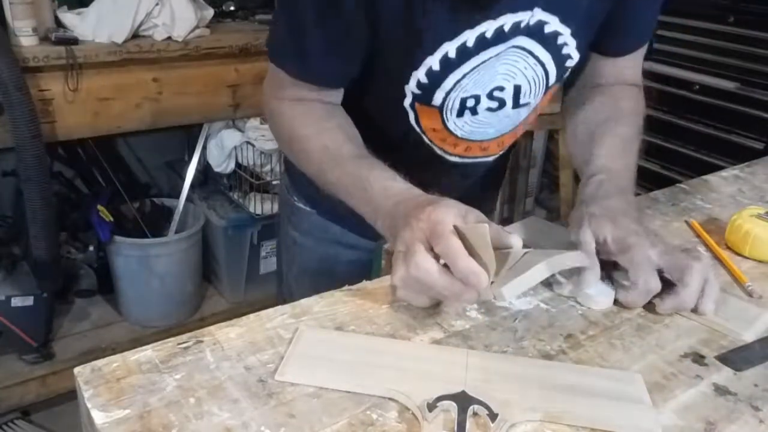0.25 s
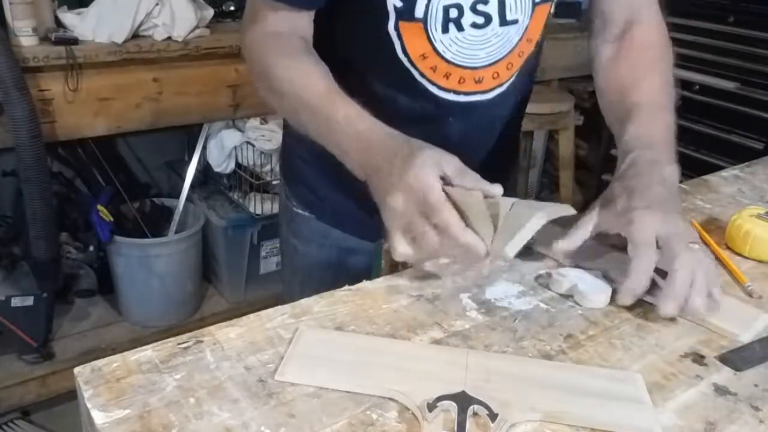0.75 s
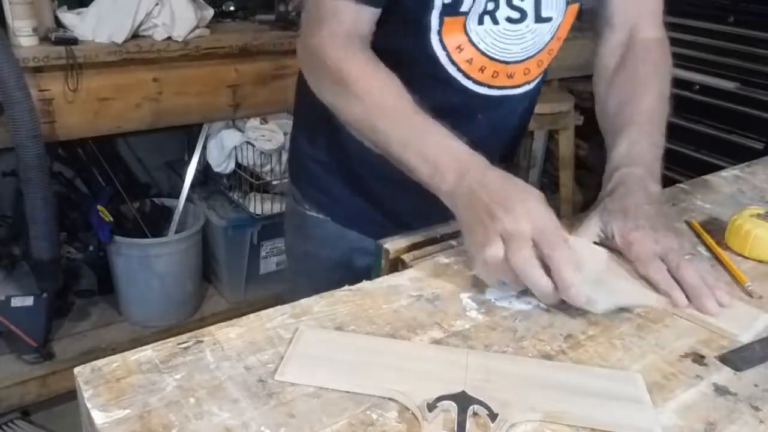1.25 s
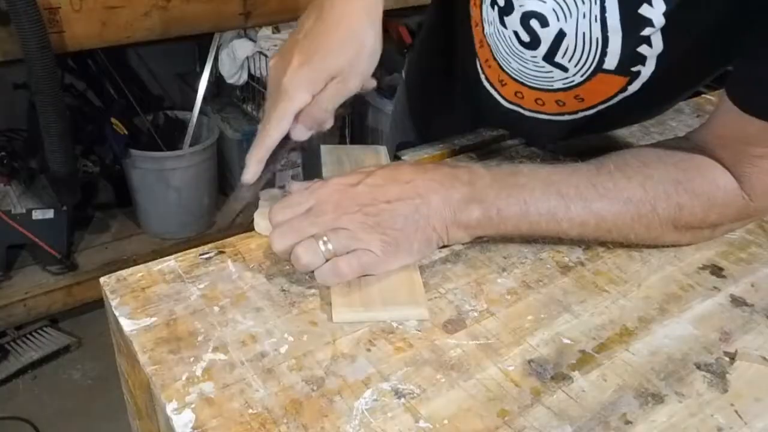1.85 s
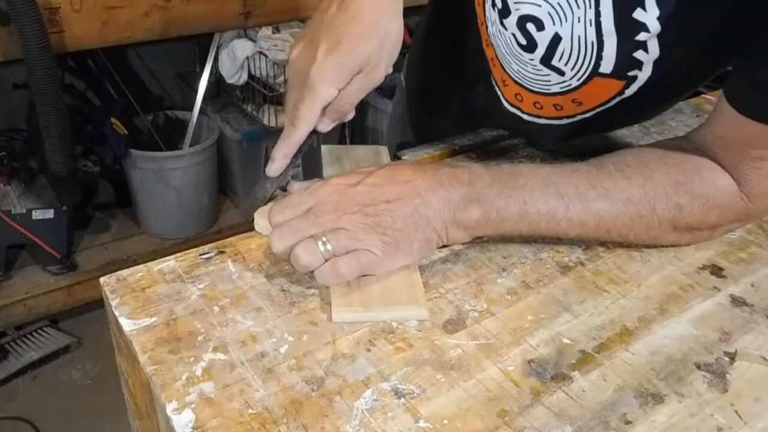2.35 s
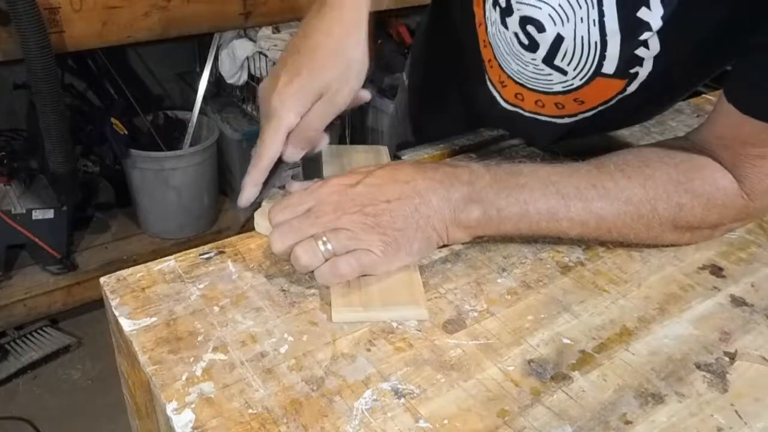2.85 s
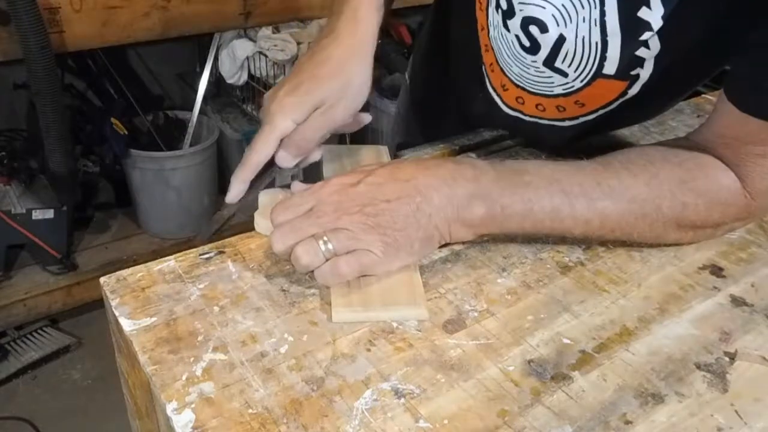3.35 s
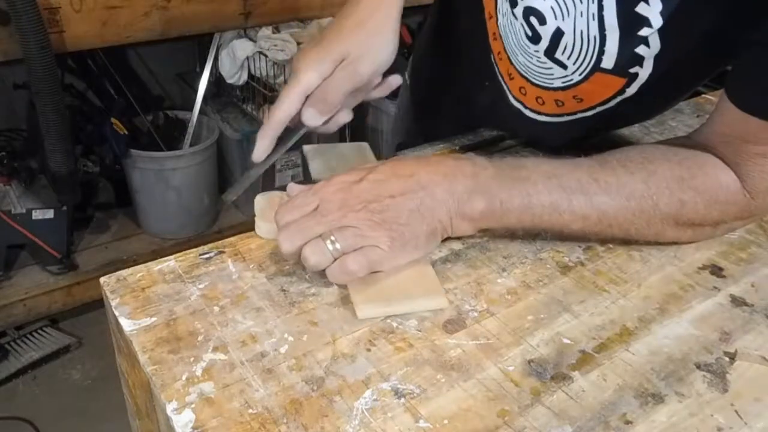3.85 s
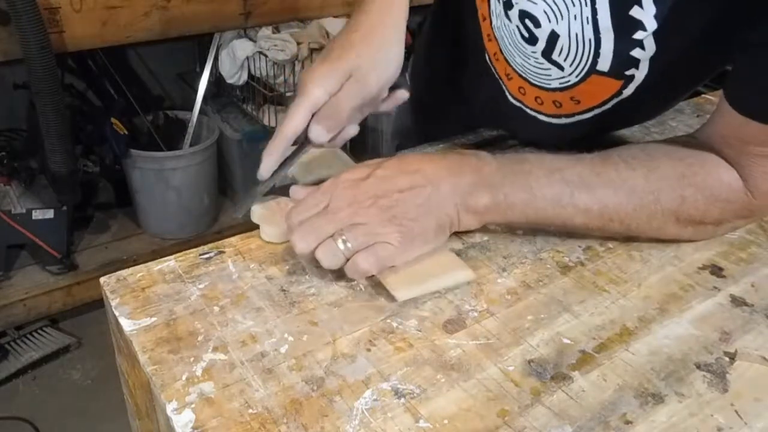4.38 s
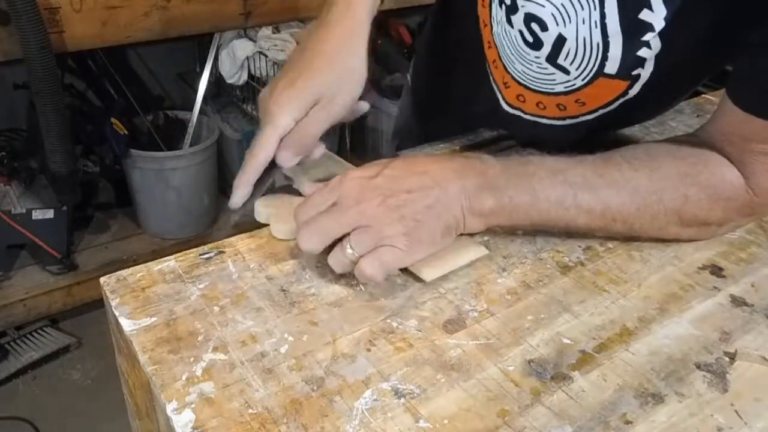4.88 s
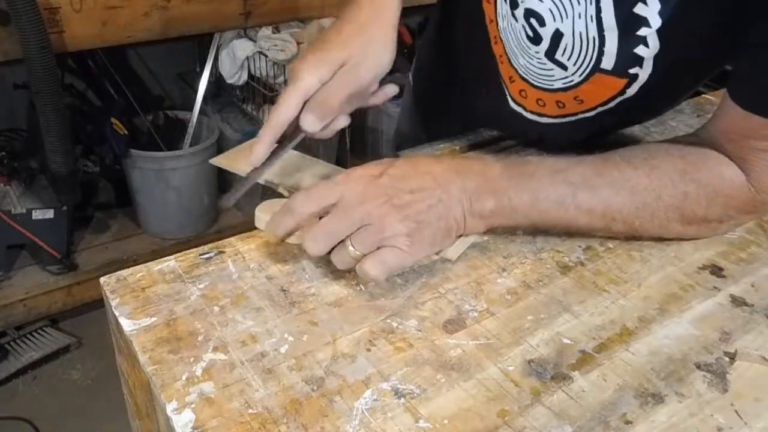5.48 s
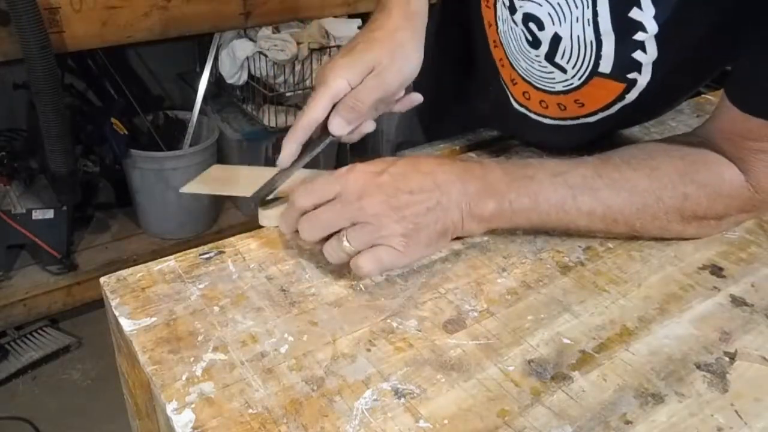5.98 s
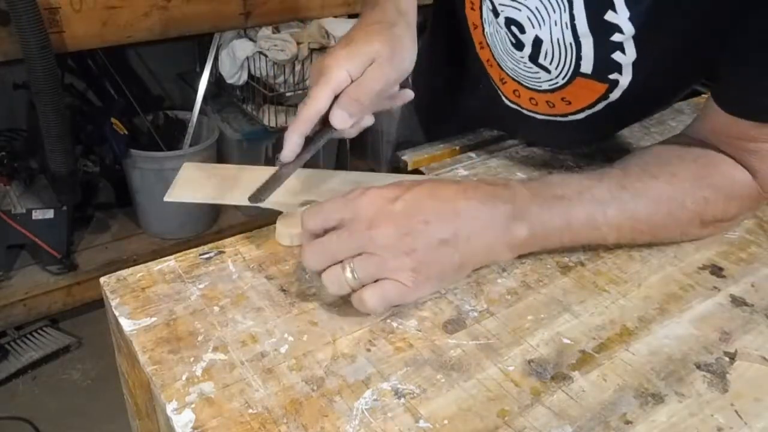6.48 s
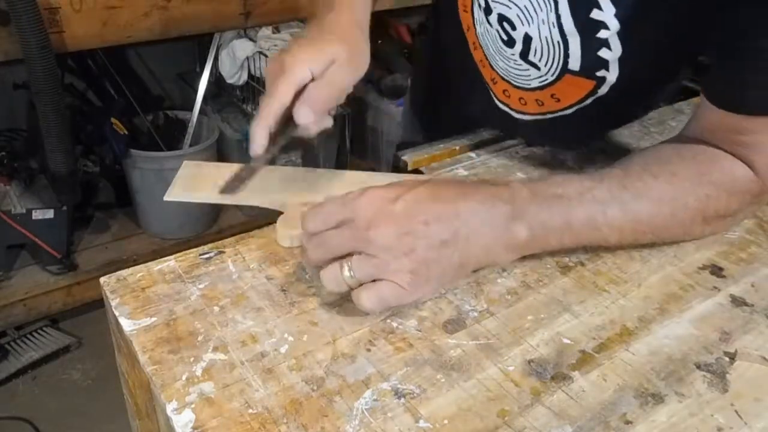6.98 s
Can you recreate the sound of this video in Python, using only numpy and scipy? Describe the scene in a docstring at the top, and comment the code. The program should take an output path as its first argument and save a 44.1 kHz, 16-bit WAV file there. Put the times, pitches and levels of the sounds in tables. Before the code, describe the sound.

Brief dry sanding scuffs, then short woody file strokes with sharp knocks on a hollow-ringing piece, ending with a board sliding over a bench.

```python
"""Sanding and filing at a bench

Hand work in a small workshop, heard by a two-port microphone, a little louder on the left. The tail of a woody
knock fades, a scrap is pushed aside, sandpaper crinkles and rubs four times; then a file knocks and strokes
a wooden piece and a board is slid. Hand speed sets the loudness of each movement and the pitch of bites and rasps.
Random fractures and knocks ring piece, bench and steel through resonances; a short room and hiss surround them."""
import sys
import numpy as np
from scipy import signal
from scipy.fft import rfft, irfft
from scipy.io import wavfile

SR = 44100
rng = np.random.default_rng(int(sys.argv[2]) if len(sys.argv) > 2 else 0)


def log_audio(samples):
    """Write samples as a 16-bit WAV file to the path given in sys.argv[1]."""
    # one column per channel
    frames = np.atleast_2d(samples).T
    # limit to full scale, then quantise
    limited = np.clip(frames, -1, 1)
    pcm = np.round(limited * 32767).astype(np.int16)
    wavfile.write(sys.argv[1], SR, pcm)


N = 318843
TIME = np.arange(N) / SR  # s
FREQ = np.maximum(np.fft.rfftfreq(8192, 1 / SR), 1)  # Hz
# All levels in the tables are relative: each layer also has its own trim in dB.

# File strokes on the piece. Each row: start in seconds, speeding up in seconds, slowing down in seconds,
# speed at touch-down [0-1], ring of the piece in dB, thrum of the bench in dB, hiss of the teeth in dB.
STROKES = [(1.628, 0.087, 0.1, 0.41, -29.5, -32.5, -41.5), (2.015, 0.061, 0.0304, 0.51, -40, -38.5, -47),
           (2.088, 0.006, 0.06, 0.9, -31, -36, -38.5), (2.132, 0.0077, 0.064, 0.81, -32.5, -41.5, -55),
           (2.245, 0.033, 0.071, 0.6, -55, -41.5, -66), (2.405, 0.0852, 0.08, 0.29, -24.5, -31.5, -36),
           (2.785, 0.12, 0.08, 0.75, -26, -36.5, -36.5), (3.17, 0.13, 0.098, 0.4, -26.5, -36, -35),
           (3.583, 0.0855, 0.0936, 0.72, -26.5, -33.5, -35), (3.825, 0.047, 0.11, 0.5, -51, -67, -54),
           (3.975, 0.13, 0.06, 0.48, -26, -32, -34.5), (4.383, 0.1, 0.09, 0.7, -30, -34, -37.5),
           (4.825, 0.093, 0.073, 0.22, -26, -36.5, -34), (5.22, 0.1, 0.053, 0.63, -39.5, -32, -43),
           (5.357, 0.008, 0.038, 0.9, -32.5, -22.5, -39.5), (6.768, 0.034, 0.11, 0.6, -40.5, -29.5, -42)]
# Resonances of the hand-held piece and file. Each row: frequency in Hz before tuning, width in Hz, level in dB.
PIECE = [(115, 11.2, -3), (202, 13, -45), (362, 18, 0.5), (511, 91, -4.5), (983, 450, -0.5),
         (1283, 510, -2), (1389, 55, 3), (1813, 148, 2.5), (2160, 325, -1.5), (2590, 360, -17),
         (2870, 470, -1.5), (3630, 80, -7.5), (4750, 150, -13), (5250, 140, -30)]
# Resonances of the bench top. Each row: frequency in Hz, width in Hz, level in dB.
BENCH = [(192, 22, 8.5), (252.5, 43, 6), (291, 87, 0), (353, 105, 4), (657, 490, -4), (847, 160, 2.5),
         (1300, 180, -7)]
# Hiss of the teeth. Each row: frequency in Hz, level in dB per Hz.
TEETH = [(2500, -28), (4000, 2), (4900, 4), (5600, -0.5), (6300, 0.5), (7400, 3.5), (8400, -4.5),
         (9900, -1), (11500, -2), (13000, 0), (16000, -11)]
# Bending modes of the steel file, ringing on after a knock. Each row: frequency in Hz, width in Hz, level in dB.
FILE_MODES = [(878, 61, 21.5), (1237, 75, 13.5), (1800, 22, 8)]
# How the piece and file are held. Each row: start in seconds, tuning of the piece as a ratio,
# ring of the blade in Hz, its level in dB, frequency in Hz above which the fingers damp the piece.
GRIPS = [(0, 1.06, 7000, -7, 4800), (1.95, 1.06, 8600, -11, 6500), (2.35, 1.02, 4340, -22, 4720),
         (2.72, 0.98, 7540, -39, 5140), (3.1, 0.98, 7540, -27, 4800), (3.52, 1.01, 4990, -33, 4400),
         (3.92, 1.07, 4754, -9.5, 3400), (4.33, 1.058, 7240, -8, 2750), (4.78, 0.98, 6250, -4, 2930),
         (5.15, 0.99, 4740, -35, 3900), (6.7, 1.34, 7700, -16, 4800)]
FILE_BRAKE, TEAR_POWER, HISS_POWER = 2.5, 3.13, 2.5  # exponents of the braking and of levels that follow speed
SKIM_DB, SKIM_POWER = -4.5, 2.02  # at full speed the teeth skim and shake the bench less


def filing(piece_db=-1, bench_db=-1, hiss_db=-2, bite_db=-10, knock_db=-8, thud_db=-13,
           crack_db=-16, steel_db=-16, blade_width_hz=900, chatter_db=1.34):
    """Teeth tear fibres and the file knocks; both ring piece and bench, and the teeth hiss and ring the blade."""
    speed = hand_speed(STROKES, FILE_BRAKE)
    cut = undb(held(STROKES, axis=4)) * speed ** TEAR_POWER
    thrum = undb(held(STROKES, axis=5) + SKIM_DB * speed ** SKIM_POWER) * speed
    hiss = undb(held(STROKES, axis=6)) * speed ** HISS_POWER

    chatter = undb(chatter_db * walk(130))  # the file catches and slips
    tear = chatter * grains(rate=6000, spread_db=4.0, patchy_db=0, patch_rate=400)
    fine_grains = grains(rate=12000, spread_db=5.5, patchy_db=0.5, patch_rate=840)
    fine = undb(hiss_db) * chatter * fine_grains * hiss
    rumble = grains(rate=3000, spread_db=3, patchy_db=3.0, patch_rate=60) * thrum
    bite = undb(bite_db) * tooth_pulses(speed)
    knocks = blows(axis=1)

    on_piece = undb(piece_db) * tear * cut + bite + undb(knock_db) * knocks
    on_bench = undb(bench_db) * rumble + undb(thud_db) * blows(axis=2)
    out = ring(on_bench, body(BENCH, top_hz=1440))
    out += ring(fine + undb(crack_db) * knocks, colour(TEETH))
    out += undb(steel_db) * ring(blows(axis=4), body(FILE_MODES, top_hz=4030))

    # each new hold retunes the piece and lets another part of the blade ring
    edges = [max(int(row[0] * SR), 0) for row in GRIPS] + [N]
    for (_, tuning, blade_hz, blade_db, damped_hz), a, b in zip(GRIPS, edges, edges[1:]):
        piece = body([(hz * tuning, width, db) for hz, width, db in PIECE], top_hz=damped_hz)
        blade = undb(blade_db) * body([(blade_hz, blade_width_hz, 0)], top_hz=14000)
        piece_ring = signal.fftconvolve(on_piece[a:b], piece)
        blade_ring = signal.fftconvolve(fine[a:b], blade)
        stroke = (piece_ring + blade_ring)[:N - a]
        out[a:a + len(stroke)] += stroke
    return out


# Where the teeth bite in step and sing. Each row: start in seconds, length in seconds, level in dB,
# tooth rate at full speed in Hz, before jitter.
BITES = [(3.635, 0.096, -27.5, 633), (4.08, 0.084, -29, 980), (4.49, 0.061, -35.5, 1118),
         (4.865, 0.1, -30, 1246)]


def tooth_pulses(speed, jitter=0.0598, scatter_db=2.1, swell_power=0.28, glide_power=0.5):
    """One pulse for each row of teeth that passes the edge of the wood; each bite swells and lets go."""
    tooth_hz = held(BITES, axis=3) * speed ** glide_power * (1 + jitter * walk(400))
    phase = np.cumsum(tooth_hz) / SR  # cycles
    pulses = np.exp(1.05 * np.cos(2 * np.pi * phase))
    progress = np.clip((TIME - held(BITES, axis=0)) / held(BITES, axis=1), 0, 1)
    arch = (1 - (2 * progress - 1) ** 2) ** swell_power
    swell = arch * undb(held(BITES, axis=2))
    biting = pulses[swell > 0]
    even_pulses = (pulses - biting.mean()) / biting.std()
    return even_pulses * undb(scatter_db * walk(300)) * swell


# A tool landing on or knocking against the piece. Each row: time in seconds, piece level in dB,
# bench level in dB, contact cut-off in Hz, ring of the steel in dB.
KNOCKS = [(1.104, -12, -15, 1387, -18), (1.643, -18, -24, 2475, -21), (2.011, -9.5, -9, 2290, -5.5),
          (2.094, -11, -6, 3600, -19), (2.1286, 9.5, 2.5, 3350, 1), (2.768, -16, -7, 2260, -18),
          (2.783, 4.5, -0.5, 2400, -7), (3.164, -2.5, -13, 1570, -3.5), (3.58, 6, 2, 3500, 2),
          (3.97, -5.5, -9, 2240, -7), (4.391, -2, 0, 2160, 1.5), (4.821, -18, -20, 1499, -13),
          (5.215, -9, -8, 3377, -1), (5.358, -1.5, 8, 2580, 7), (6.763, -9.5, 3, 3370, -2.5)]


def blows(axis, spread_s=0.001575, bounce_db=-13, bounce_s=0.00349):
    """Short pushes of a tool on wood, each with a small rebound; a softer contact has a lower cut-off."""
    out = np.zeros(N)
    gaps = rng.uniform(0.614, 1.614, len(KNOCKS))  # multiples of bounce_s
    for row, gap in zip(KNOCKS, gaps):
        time_s, cutoff_hz = row[0], row[3]
        push = causal(1 / np.sqrt(1 + (FREQ / cutoff_hz) ** 5))
        # each knock sweeps upward: its treble comes a little after its bass
        delay = spread_s * np.minimum(FREQ / cutoff_hz, 1.5)
        turns = np.cumsum(delay * np.gradient(FREQ))
        push = irfft(rfft(push, 2 * len(push)) * np.exp(-2j * np.pi * turns))[:512]
        for s, db in ((time_s, row[axis]), (time_s + gap * bounce_s, row[axis] + bounce_db)):
            start = max(int(s * SR), 0)
            out[start:start + len(push)] += undb(db) * push
    return out


# Sandpaper rubs on the board. Each row: start in seconds, speeding up in seconds, slowing down in seconds,
# speed at first touch [0-1], board level in dB, grit hiss in dB, rasp at full speed in Hz.
RUBS = [(1.105, 0.075, 0.075, 0.8, -50, -41, 1080), (1.25, 0.07, 0.075, 0.3, -39, -25.5, 2773),
        (1.388, 0.037, 0.1, 0.25, -38.5, -24.5, 2150), (1.52, 0.052, 0.038, 0.2, -39, -26, 2850)]
# Resonances of the sanded board. Each row: frequency in Hz, width in Hz, level in dB.
BOARD = [(340, 730, -11), (750, 63, -3), (1020, 250, 3), (1430, 310, -2.5), (1880, 430, -1), (2500, 790, 3),
         (3200, 600, 4), (3900, 1100, -16)]
# Hiss of the grit. Each row: frequency in Hz, level in dB per Hz.
GRIT = [(1500, -18), (3500, 3.5), (5000, 1.5), (7000, -2), (9000, 1), (11500, -2), (16000, -6.5)]
RUB_BRAKE, RUB_POWER, GRIT_POWER = 1.7, 2, 2.08  # exponents of the braking and of levels that follow speed


def sanding(board_db=6.5, grit_db=-1, rasp_db=-5, rasp_width_hz=330):
    """Countless grits scratch the board, ringing it and hissing; they pass its edge at a rate set by the hand."""
    speed = hand_speed(RUBS, RUB_BRAKE)
    pressure = undb(held(RUBS, axis=4)) * speed ** RUB_POWER
    coarse = grains(rate=8500, spread_db=3, patchy_db=2.0, patch_rate=590) * pressure
    hiss = undb(held(RUBS, axis=5)) * speed ** GRIT_POWER
    fine = grains(rate=22000, spread_db=1.5, patchy_db=3, patch_rate=380) * hiss

    # slow noise on a gliding tone makes a band of noise that follows the speed
    lowpass = signal.butter(2, rasp_width_hz, fs=SR, output="sos")
    scatter = signal.sosfilt(lowpass, rng.standard_normal(N))
    tone = np.sin(2 * np.pi * np.cumsum(held(RUBS, axis=6) * speed) / SR)
    rasp = unit(scatter * tone) * pressure

    board_ring = undb(board_db) * ring(coarse, body(BOARD, top_hz=5500))
    return board_ring + undb(grit_db) * ring(fine, colour(GRIT)) + undb(rasp_db) * rasp


# Sandpaper crinkling in the fingers. Each row: start in seconds, level in dB, centre in Hz.
CRINKLES = [(0.773, -14.5, 6240), (0.786, -13, 7600), (0.845, -14.5, 10100), (0.927, -19.5, 4700),
            (0.963, -17, 4400), (0.987, -20, 5000), (1.037, -18, 3440), (1.252, -11, 2170),
            (1.529, -6.5, 3320)]


def crinkling(width=3.1, level_db=0):
    """Stiff paper snaps in bursts a few milliseconds long, each a noise decay through one broad resonance."""
    out, t = np.zeros(N), TIME[:1024]
    for s, db, hz in CRINKLES:
        burst = rng.standard_normal(len(t)) * np.exp(-t / .0017)
        burst = burst / np.linalg.norm(burst)
        snap = signal.fftconvolve(burst, body([(hz, width * hz, 0)], top_hz=15200))
        start = int(s * SR)
        out[start:start + len(snap)] += undb(db + level_db) * snap
    return out


# A scrap sliding over the bench. Each row: start in seconds, speeding up in seconds, slowing down in seconds,
# speed at first touch [0-1], level in dB.
SCRAP_SLIDE = [(0.255, 0.12, 0.16, 0.38, -40.5), (0.555, 0.098, 0.05, 0.84, -53.5)]
# The board sliding over the bench; the row at 0.0 is a knock's fading tail. Each row: start in seconds,
# speeding up in seconds, slowing down in seconds, speed at first touch [0-1], level in dB, singing in dB.
BOARD_SLIDE = [(0.0, 0.0034, 0.066, 1, -56, -41.5), (5.785, 0.089, 0.083, 0.13, -40, -53),
               (6.27, 0.084, 0.19, 0.26, -54, -49.5), (7.13, 0.18, 0.05, 0.18, -39, -48.5)]
# Colour of the sliding scrap. Each row: frequency in Hz, level in dB per Hz.
SCRAP_COLOUR = [(88, -32), (150, -6.5), (264, -8), (348, 0), (466, -7), (566, -4), (888, -9), (1210, -2.5),
                (1760, -7.5), (2400, -1), (2870, -9.5), (4760, -0.5), (6140, -7.5), (11900, -9),
                (16000, -16)]
# Colour of the sliding board. Each row: frequency in Hz, level in dB per Hz.
BOARD_COLOUR = [(200, -10.5), (420, -4.5), (510, 1.5), (600, 0.5), (1300, -0.5), (2150, -3), (2370, -1.5),
                (2600, -4.5), (4000, -3), (4400, 0.5), (5300, -9.5), (7500, -6), (16000, -8.5)]
SLIDE_BRAKE, SLIDE_POWER = 1.65, 1.87  # exponents of the braking and of the level that follows speed


def sliding(table, points, level_db):
    """Smooth wood dragged over the dusty bench, louder the faster it goes."""
    dust = grains(rate=13000, spread_db=5, patchy_db=1.6, patch_rate=160)
    drag = undb(held(table, axis=4)) * hand_speed(table, SLIDE_BRAKE) ** SLIDE_POWER
    return undb(level_db) * ring(dust * drag, colour(points))


# The thin board sings as it is dragged. Each row: frequency in Hz, width in Hz, level in dB.
BOARD_RING = [(502, 70, 3), (1350, 220, -0.5), (1800, 260, -8), (2400, 36, 0.5), (3560, 120, -16)]


def board_singing(level_db=0):
    """The dragged board catches on the bench and rings in its own modes; the opening knock's tail rings them too."""
    catches = grains(rate=5000, spread_db=0, patchy_db=2.0, patch_rate=80)
    drag = undb(held(BOARD_SLIDE, axis=5)) * hand_speed(BOARD_SLIDE, SLIDE_BRAKE) ** SLIDE_POWER
    return undb(level_db) * ring(catches * drag, body(BOARD_RING, top_hz=5000))


TOUCH_S = 0.006  # time to make full contact


def hand_speed(table, brake):
    """Speed of the hand, 0-1: it touches down, eases up to full speed and brakes to a stop."""
    out = np.zeros(N)
    for start, rise, fall, entry, *_ in table:
        now = (TIME >= start) & (TIME < start + rise + fall)
        t = TIME[now] - start
        speeding = 1 - (1 - np.clip(entry, 0, 1)) * np.clip(1 - t / rise, 0, 1) ** 2
        braking = 1 - np.clip((t - rise) / fall, 0, 1) ** brake
        contact = np.minimum(t / TOUCH_S, 1)
        out[now] = np.maximum(out[now], speeding * braking * contact)
    return out


def held(table, axis):
    """One column of an event table, each value held until the next event."""
    rows = np.array(table)
    return rows[np.searchsorted(rows[1:, 0], TIME), axis]


def grains(rate, spread_db, patchy_db, patch_rate):
    """Tiny fractures of unequal size at a mean rate per second, louder and softer in random patches."""
    struck = rng.random(N) < rate / SR
    sizes = undb(spread_db * rng.standard_normal(N))
    clicks = struck * rng.choice([-1, 1], N) * sizes
    return unit(clicks * undb(patchy_db * walk(patch_rate)))


def walk(rate):
    """Random values joined by straight lines, at a rate in Hz, with an rms of one."""
    count = int(TIME[-1] * rate) + 2
    return unit(np.interp(TIME * rate, np.arange(count), rng.standard_normal(N)[:count]))


def body(modes, top_hz, skirt=1.525):
    """Response of damped resonances, falling away above the top."""
    power = 0
    for hz, width, db in modes:
        detuning = (FREQ / hz - hz / FREQ) * hz / width
        power = power + undb(db) ** 2 / (1 + detuning ** 2) ** skirt
    return causal(np.sqrt(power / (1 + (FREQ / top_hz) ** 4)))


def colour(points):
    """Response of a smooth (Hz, dB) spectrum."""
    hz, db = np.transpose(points)
    return causal(undb(np.interp(np.log(FREQ), np.log(hz), db)))


def causal(gain):
    """Shortest (minimum-phase) impulse response with this shape of gain over FREQ, of unit energy."""
    cepstrum = irfft(np.log(gain + 1e-6))
    half = len(cepstrum) // 2
    folded = 2 * cepstrum[:half] * (np.arange(half) > 0)
    h = irfft(np.exp(rfft(folded, 2 * half)))[:half]
    return h / np.linalg.norm(h)


def ring(x, response):
    """Pass a sound through an impulse response."""
    return signal.oaconvolve(x, response)[:N]


def undb(db):
    """Decibels to gain."""
    return 10 ** (np.asarray(db) / 20)


def unit(x):
    """Scale to an rms of one."""
    return x / np.sqrt(np.mean(x ** 2))


def shop(x, lag_ms, left_db, wet_db, treble_wet_db, alternate_hz=5):
    """Two microphone ports hear the direct sound a little apart, then echoes alternating between two patterns."""
    turn = 2 * np.pi * alternate_hz * TIME
    size = 2 ** 19
    freq = np.fft.rfftfreq(size, 1 / SR)
    out = []
    for side in (1, -1):  # left, right: half the lag and half the level difference each
        shift = np.exp(-1j * np.pi * freq * side * lag_ms / 1000)
        direct = irfft(rfft(x, size) * shift)[:N]
        echoes = 0
        for share in (np.cos(turn), np.sin(turn)):  # a steady alternation keeps the room diffuse
            echoes = echoes + ring(x * share, room_tail(wet_db, treble_wet_db))
        out.append(undb(side * left_db / 2) * (direct + echoes))
    return np.array(out)


def room_tail(wet_db, treble_wet_db, t60_low=0.25, t60_high=0.11):
    """Dense echoes from bench and shelves; the treble dies first."""
    t = TIME[:SR // 3]
    onset = np.clip(t / 0.00089 - 1, 0, 1)  # silent for 0.89 ms, then fading in
    noise = rng.standard_normal(len(t)) * onset
    low = signal.sosfiltfilt(signal.butter(2, 4000, fs=SR, output="sos"), noise)
    tail = 0
    for band, t60, db in ((low, t60_low, wet_db), (noise - low, t60_high, treble_wet_db)):
        decay = np.exp(-np.log(1000) * t / t60)
        tail = tail + undb(db) * band * decay / np.linalg.norm(decay)
    return tail


# Still air of the shop. Each row: frequency in Hz, level in dB per Hz.
AIR = [(12, -31), (20, -0.5), (40, -10), (60, -11.5), (241, -12), (367, -13.5), (434, -15), (527, -14),
       (1810, -16), (3340, -18.5), (3840, -20), (6720, -25), (14700, -27), (16000, -29)]
AIR_DB = -51


def air(side_low_db=-5, side_high_db=0):
    """Steady hiss and faint rumble from shaped noise, more alike in both ears in the bass."""
    log_freq = np.log(np.fft.rfftfreq(N, 1 / SR) + 1)
    width = undb(np.interp(log_freq, np.log([500, 6000]), [side_low_db, side_high_db]))
    mid, side = (unit(ring(rng.standard_normal(N), colour(AIR))) for _ in range(2))
    side = irfft(rfft(side) * width, N)
    return np.array([mid + side, mid - side]) * undb(AIR_DB)


def scene():
    """Sanding and filing in the same shop, over its hiss; the paper work carries more of the room."""
    paper_work = sanding() + crinkling() + sliding(SCRAP_SLIDE, SCRAP_COLOUR, level_db=2)
    file_work = filing() + sliding(BOARD_SLIDE, BOARD_COLOUR, level_db=0) + board_singing()
    paper_heard = shop(paper_work, lag_ms=0.051, left_db=1.0, wet_db=-2, treble_wet_db=0.5)
    file_heard = shop(file_work, lag_ms=0.018, left_db=2.0, wet_db=-8.5, treble_wet_db=-3.0)
    return paper_heard + file_heard + air()


DIP_S, DIP_HALF_S, DIP_DB = 1.619, 0.025, -23  # the whole sound dips briefly: centre, half length, depth
OUTPUT_DB, TOP_HZ = -2, 16000


def record(dry):
    """The level dips once, and the top is cut steeply."""
    dip = np.maximum(1 - np.abs(TIME - DIP_S) / DIP_HALF_S, 0)
    gain = undb(OUTPUT_DB + DIP_DB * dip)
    top_cut = signal.ellip(10, .2, 70, TOP_HZ, fs=SR, output="sos")
    return signal.sosfilt(top_cut, dry * gain)


dry = scene()
out = record(dry)
log_audio(out)
```